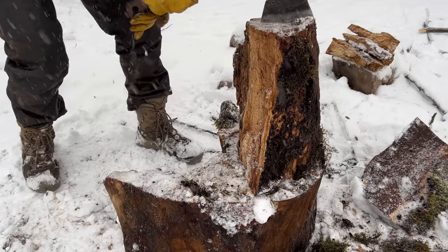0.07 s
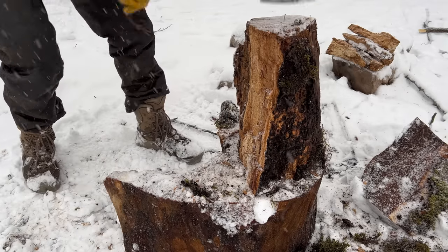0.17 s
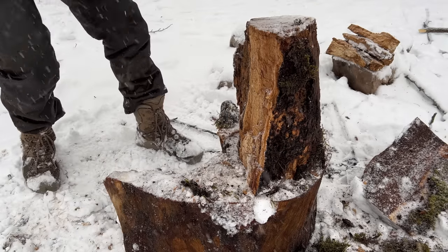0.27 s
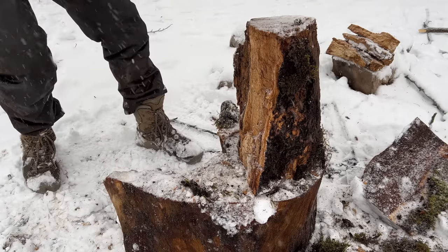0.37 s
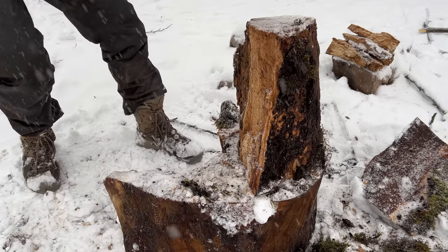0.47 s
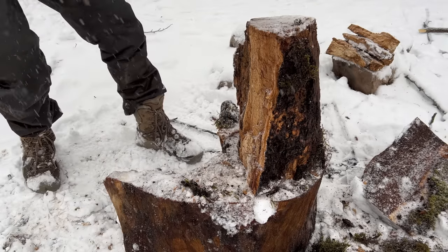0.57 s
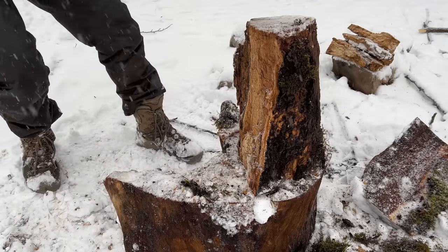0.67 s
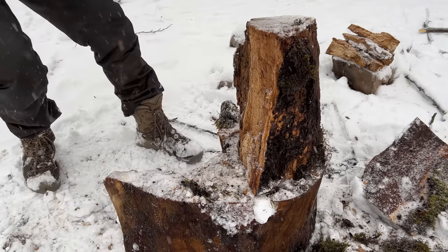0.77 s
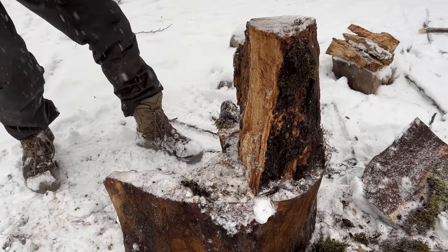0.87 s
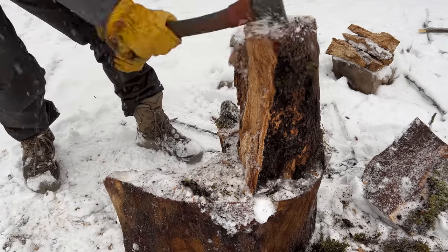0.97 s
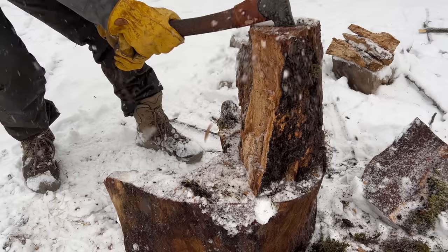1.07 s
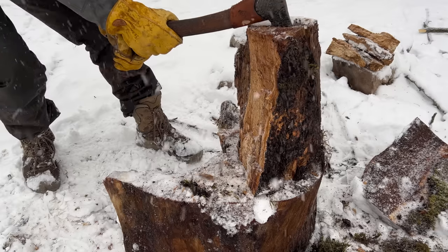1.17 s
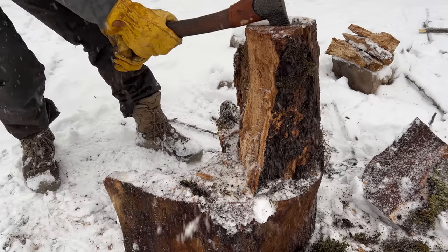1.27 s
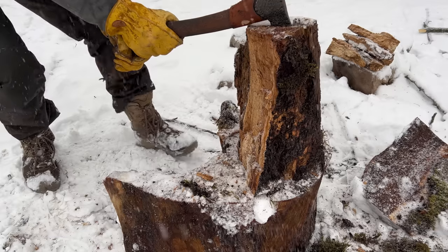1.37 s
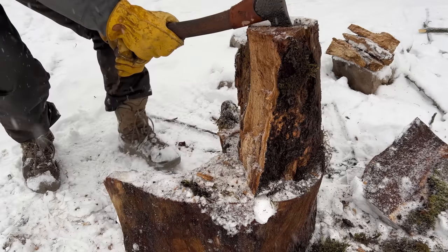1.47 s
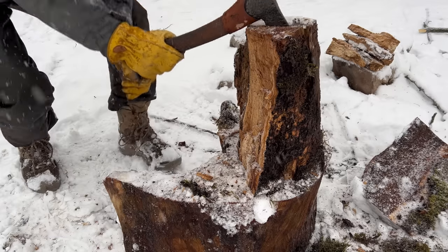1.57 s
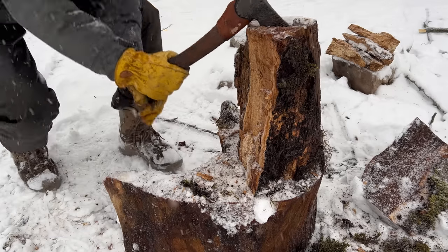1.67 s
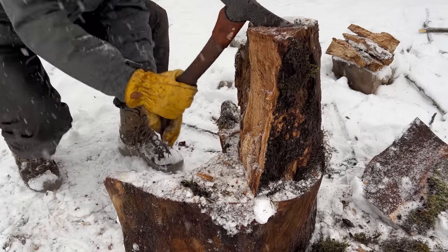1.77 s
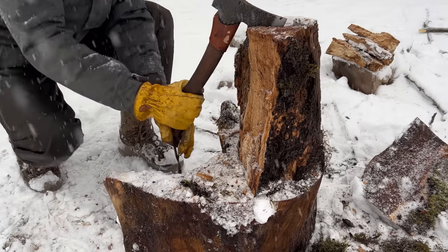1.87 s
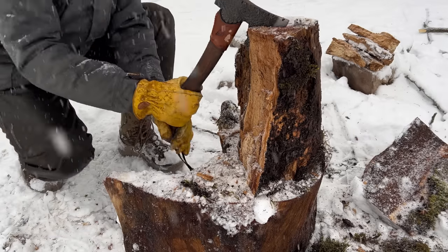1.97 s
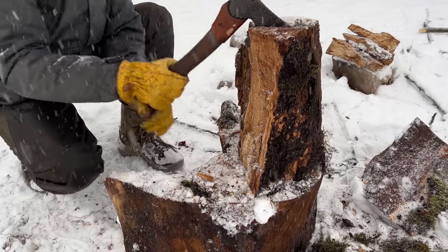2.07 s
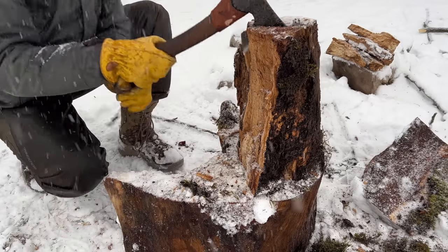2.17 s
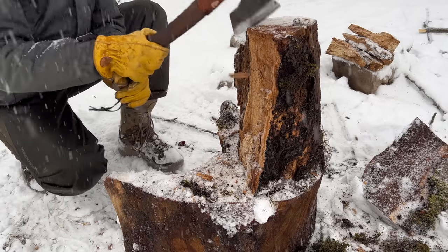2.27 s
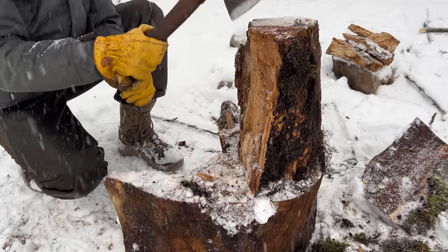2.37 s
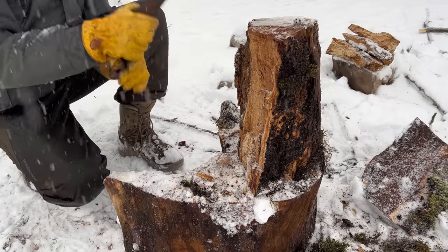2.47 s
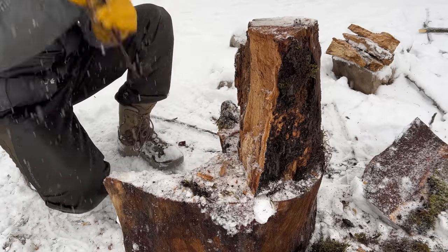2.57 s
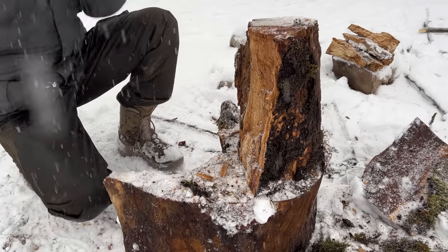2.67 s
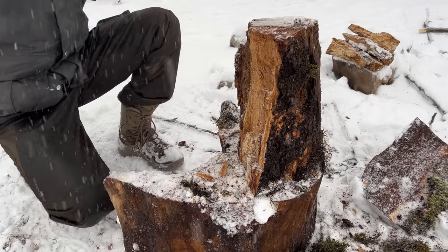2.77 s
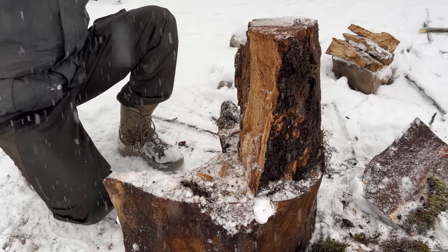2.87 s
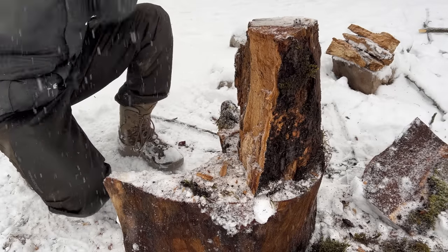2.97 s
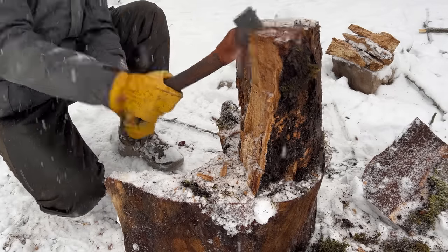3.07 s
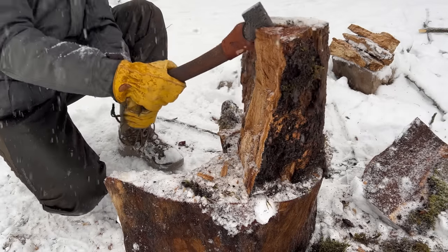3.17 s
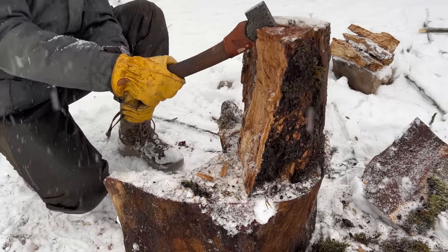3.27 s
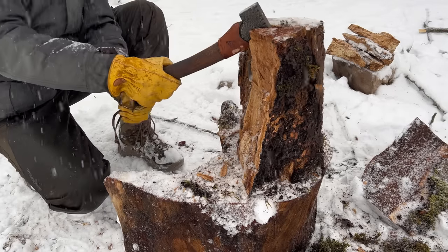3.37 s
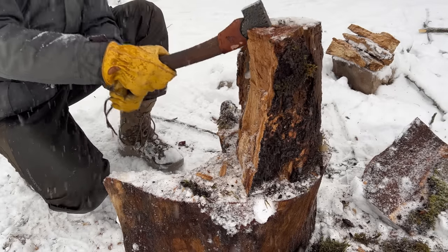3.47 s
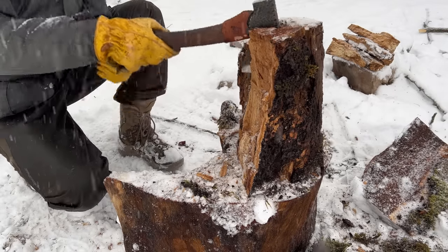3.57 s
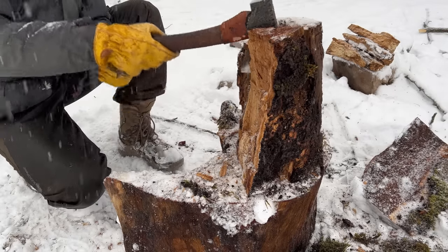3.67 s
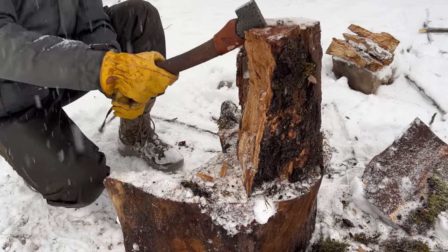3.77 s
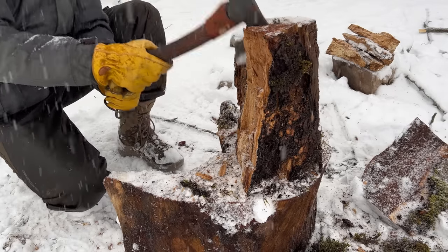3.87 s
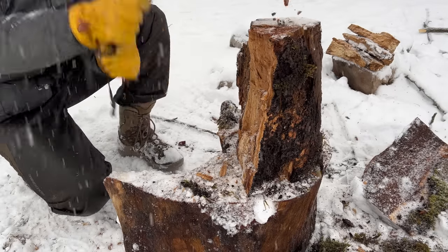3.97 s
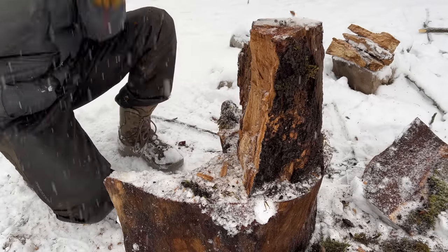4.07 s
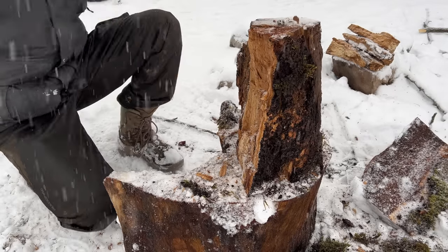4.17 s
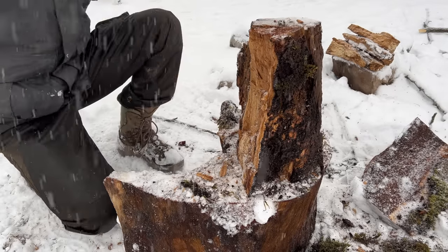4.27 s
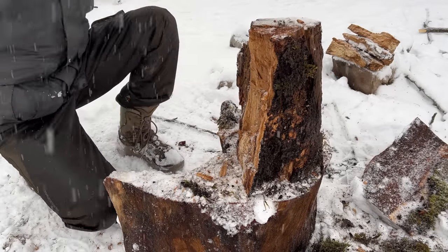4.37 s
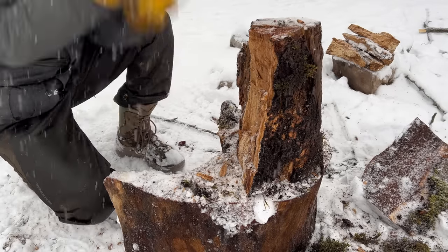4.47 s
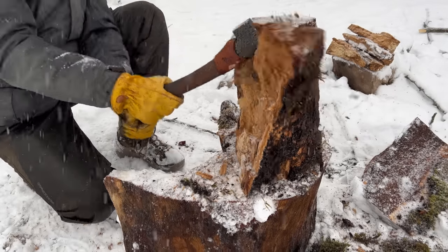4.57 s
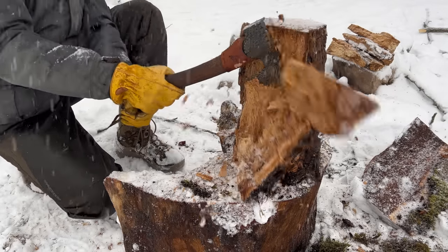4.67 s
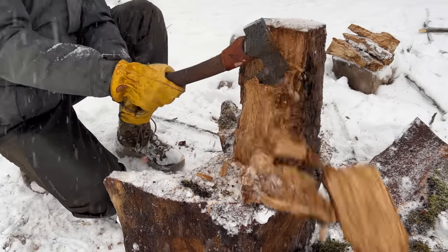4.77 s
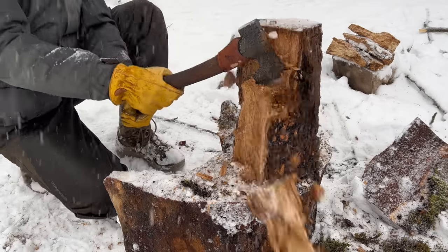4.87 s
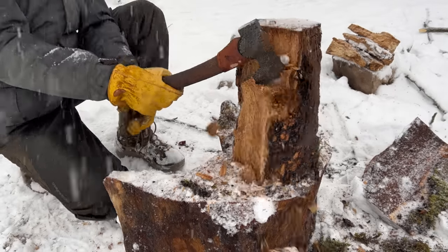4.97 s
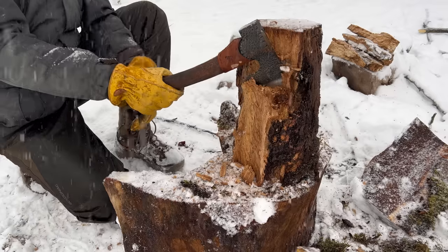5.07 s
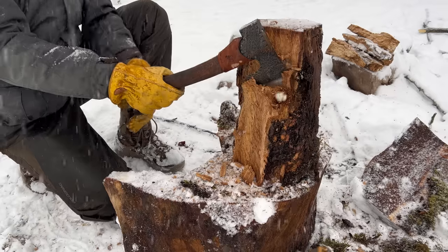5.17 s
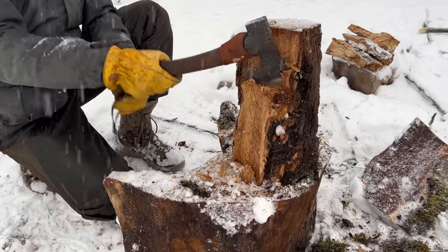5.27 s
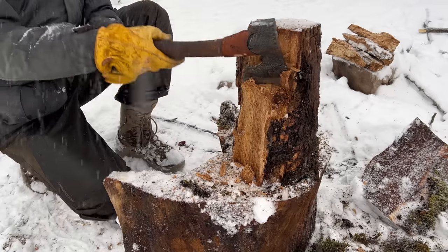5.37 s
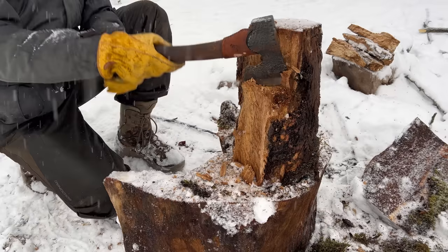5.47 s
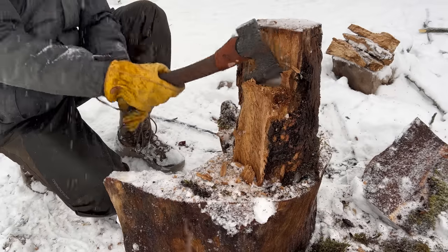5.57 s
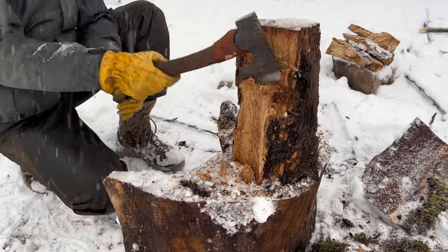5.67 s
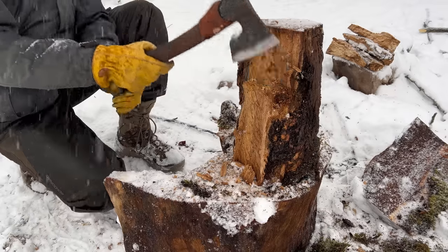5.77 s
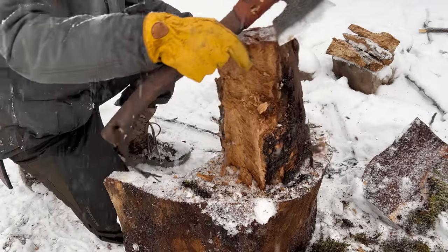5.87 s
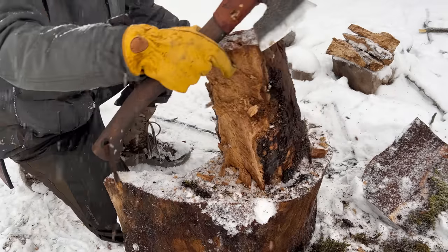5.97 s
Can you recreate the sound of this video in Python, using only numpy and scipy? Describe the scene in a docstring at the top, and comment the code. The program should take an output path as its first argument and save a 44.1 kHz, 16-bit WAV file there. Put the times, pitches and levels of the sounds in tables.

```python
"""An axe chops an upright log on a stump in snow, close to a small camera with two microphone ports; no walls, dry air.
Throughout, boots and knees thud and crunch in the snow and winter clothing rustles: gritty noise and damped rings.
Three blows, at 0.9, 3.1 and 4.5 s, are tearing noise ringing the log's modes and shoving the stump; between them
the blade is levered free and wood creaks. A chunk drops after the second; the last splits off a slab that lands at 4.9 s.
The camera's steep bass filter lets low notes arrive late, so every thud glides down."""
import sys
import numpy as np
from scipy import signal
from scipy.fft import rfft, irfft, next_fast_len
from scipy.io import wavfile
from scipy.ndimage import uniform_filter1d

SR = 44100
rng = np.random.default_rng(int(sys.argv[2]) if len(sys.argv) > 2 else 0)


def field_ratio(decibels):
    """Amplitude ratio for a level in dB (20 dB per decade); scalars and array-likes work."""
    return 10 ** (np.asarray(decibels, dtype=float) / 20)


def unload_wav(signal):
    """Save mono or channel-first audio to the path in sys.argv[1] as 16-bit WAV at rate SR, clipped to [-1, 1]."""
    wavfile.write(
        sys.argv[1],
        SR,
        np.round(np.clip(np.atleast_2d(signal).T, -1, 1) * 32767).astype(np.int16),
    )


N = 264644
SIZE = next_fast_len(N + SR // 2)
HZ = np.maximum(np.arange(SIZE // 2 + 1) * SR / SIZE, 1)
SIDES = np.array([[1], [-1]])  # left, right

# wood fibres tearing; the last two rows are one blow: start_s, length_ms, body_db, treble_db, thump_db
BLOWS = [(0.9298, 6.05, -7.5, -13, -22.5), (3.0569, 17, -14, -17.5, -19), (4.5238, 8.5, -15, -19.5, -38.5),
         (4.5297, 7.1, -11.5, -18, -21)]
# pieces hitting the ground, a chunk, then the slab, edge and face: start_s, length_ms, body_db, treble_db, thump_db
LANDING = [(3.250, 15.9, -42.5, -63.5, -35.5), (4.932, 14, -51, -40.5, -32.5),
           (4.9455, 2.6, -25.5, -31, -33.5), (4.950, 9, -45, -34.5, -70), (4.9598, 4.7, -18.5, -43.5, -29),
           (4.966, 7.5, -39.5, -33, -52)]
# weight shifting in the snow, as the level of its crunch: time_s, level_db
WEIGHT_SHIFTS = [(0, -68), (.5, -63.5), (.7, -70), (.88, -62.5), (1.2, -73), (1.45, -53), (1.53, -59),
                 (1.68, -49.5), (1.9, -58), (2.05, -49.5), (2.3, -68), (2.5, -68), (2.72, -51),
                 (2.87, -63.5), (3.0, -48.5), (3.4, -66), (3.8, -64), (3.95, -72), (4.2, -62), (4.33, -71),
                 (4.45, -58.5), (4.8, -67.5), (5.1, -60.5), (5.45, -72), (5.85, -74.5), (5.93, -63),
                 (6, -62)]
# the log ahead, seen from the two microphone ports: frequency_hz, left_minus_right_db
AHEAD_BALANCE = [(60, -8.5), (110, 7.5), (200, -1.5), (380, 10), (700, 2.5), (1290, 0), (2380, -2.5),
                 (4400, -2), (8120, -0.5), (15000, 0)]


def read(table):
    """A table of frequency and value, read at every frequency."""
    hz, value = np.transpose(table)
    return np.interp(np.log(HZ), np.log(np.maximum(hz, 1)), value)


def through(x, gain):
    """Apply a frequency response."""
    return irfft(rfft(x, SIZE) * gain, SIZE)[..., :N]


def unit(x):
    """Scale to rms 1."""
    return x / np.sqrt(np.mean(abs(x) ** 2))


def ring(hz, width_hz):
    """Response of one resonance, gain 1 at its centre."""
    return 1 / (1 + 1j * (HZ / hz - hz / HZ) * hz / width_hz)


def walk(rate):
    """Random levels held 1 / rate s and smoothed twice; spread near 1."""
    hold = int(SR / rate)
    steps = np.repeat(rng.standard_normal(N // hold + 1), hold)
    return 0.49 * uniform_filter1d(uniform_filter1d(steps, hold), hold)[:N]


def grit(rate, spread_db):
    """Hiss strewn with short grains of uneven size, rate of them a second."""
    size = field_ratio(spread_db * np.minimum(rng.exponential(size=N), 3))
    grains = (rng.random(N) < rate / SR) * size
    return rng.standard_normal(N) * (1 + uniform_filter1d(grains, size=40) * 40)


def add(out, s, sound, pan_db):
    """Mix a short sound in at a time and side."""
    i = int(s * SR)
    out[:, i:i + len(sound)] += field_ratio(SIDES * pan_db / 2) * sound


def rustle(spectrum, level_db, rate, spread_db, flicker_db, likeness):
    """Gritty noise from a wide source; it swells, flickers and is only partly alike in the two ports."""
    mid, side = grit(rate, spread_db), grit(rate, spread_db)
    like = np.clip(likeness, 0, 1)
    pair = np.sqrt(1 + like) * mid + SIDES * np.sqrt(1 - like) * side
    tilt = field_ratio(SIDES * read(AHEAD_BALANCE) / 2)
    swell_db = 1.0
    unrest_db = flicker_db * unit(walk(30)) + swell_db * unit(walk(11))
    return unit(through(pair, field_ratio(read(spectrum)) * tilt)) * field_ratio(level_db + unrest_db)


def moves():
    """Snow crunching under boots and knees, and cloth rubbing on cloth; both flare around the blows."""
    # spectrum of crunching snow: frequency_hz, density_db
    crunch_spectrum = [(18, -38), (30, -11.5), (70, -0.5), (189, -6.5), (226, -2.5), (437, -4.5),
                       (800, -6.5), (1040, -37.5), (1760, -120)]
    # spectrum of the cloth's body: frequency_hz, density_db
    cloth_spectrum = [(290, -34.5), (500, -13), (594, -9), (750, -8.5), (796, -2.5), (1900, 2.5),
                      (2900, -7), (3900, -40.5), (6600, -120)]
    # spectrum of the cloth's treble sheen: frequency_hz, density_db
    sheen_spectrum = [(1800, -16), (2700, -1.5), (4000, -0.5), (5500, -1.5), (7000, -4), (8500, -2.5),
                      (12000, -2.5), (16000, -18.5)]
    # how briskly the body moves, as the level of the cloth's sheen: time_s, level_db
    motion = [(0, -59), (.09, -54), (.13, -61.5), (.27, -61), (.5, -53.5), (.7, -67), (.85, -56),
              (1.03, -65.5), (1.27, -68), (1.42, -52), (1.52, -60), (1.66, -49.5), (1.9, -52.5),
              (2.06, -45.5), (2.16, -49.5), (2.32, -67.5), (2.47, -54.5), (2.6, -59), (2.73, -51),
              (2.88, -65), (3.0, -48), (3.2, -64), (3.42, -63), (3.54, -55.5), (3.66, -68), (3.84, -55),
              (4.08, -60), (4.22, -53.5), (4.34, -66.5), (4.45, -51.5), (4.72, -61), (4.88, -61),
              (5.1, -56.5), (5.44, -60), (5.56, -58), (5.68, -66.5), (5.85, -64), (5.91, -56), (6, -58)]
    t = np.arange(N) / SR
    motion_db = np.interp(t, *np.transpose(motion))
    weight_db = np.interp(t, *np.transpose(WEIGHT_SHIFTS))
    # the cloth's body follows the sheen by 0.58 dB per dB, from -61.5 dB at a quiet -63.5 dB
    steady_db = weight_db, -61.5 + 0.58 * (motion_db + 63.5), motion_db

    # sleeves whip before each blow; snow sprays after each blow and the slab's landing
    swing_s, spray_s = 0.025, 0.043
    swing_db, spray_db = (-51.5, -53.5, -48.5), (-48.5, -48, -49)  # crunch, cloth, sheen
    blows = [row[0] for row in BLOWS[:3]]
    swing = sum((t < s) * np.exp(np.minimum(t - s, 0) / swing_s) for s in blows)
    spray = sum((t >= s) * np.exp(-np.maximum(t - s, 0) / spray_s) for s in blows + [LANDING[4][0]])
    crunch_db, cloth_db, sheen_db = (20 * np.log10(field_ratio(db) + field_ratio(before_db) * swing + field_ratio(after_db) * spray)
                                     for db, before_db, after_db in zip(steady_db, swing_db, spray_db))

    crunch = rustle(crunch_spectrum, crunch_db, 72, 2.2, 2.5, 0.22)
    cloth = rustle(cloth_spectrum, cloth_db, 87, 1.2, 1.4, 0.26)
    sheen = rustle(sheen_spectrum, sheen_db, 150, 0.67, 1.0, 0.099)

    # near the end the crunch and rustle dip for a moment
    dip_s, dip_ms, dip_db = 5.866, 6.3, -23.5
    dip = field_ratio(dip_db * np.exp(-((t - dip_s) * 1000 / dip_ms) ** 2))
    return (crunch + cloth + sheen) * dip


def ticks():
    """Chips and ice grains: dry clicks of fast-dying noise, about an octave and a half wide."""
    # chips and ice grains: start_s, peak_db, pitch_hz, left_minus_right_db
    grains = [(0.013, -31.5, 4000, 2), (0.16, -38, 2600, -4), (0.635, -48, 4950, -0.5),
              (1.1228, -42.5, 2900, 4), (1.22, -49, 3700, -5), (1.3117, -51, 2790, -3),
              (1.4554, -39.5, 2490, -13), (2.44, -43, 2740, 2), (2.566, -46, 2500, -13),
              (2.982, -35, 8550, -2), (3.088, -20.5, 5970, -15), (3.0974, -31, 3040, -0.5),
              (3.3866, -45.5, 3770, -1.0), (3.5728, -34.5, 6200, -5), (4.62, -33, 7720, 1),
              (4.6866, -46, 4310, -10), (5.2609, -44, 4500, -14), (5.3143, -44, 2540, -13),
              (5.3872, -43, 5000, -10), (5.4494, -44, 2520, -15), (5.5398, -39, 6180, -1.5),
              (5.7019, -50, 3430, -25)]
    decay_s = .0012
    t, out = np.arange(int(.012 * SR)) / SR, np.zeros((2, N + SR))
    for s, db, hz, pan_db in grains:
        puff = rng.standard_normal(len(t)) * np.exp(-t / decay_s)
        band = [hz / 1.3, min(hz * 2.2, .4 * SR)]
        click = signal.lfilter(*signal.butter(2, band, "band", fs=SR), puff)
        add(out, s, field_ratio(db) * click / abs(click).max(), pan_db)
    return out[:, :N]


def thud(hz):
    """A broad, damped ring without rumble under it; the packed snow answers a little later, low and soft."""
    t = np.arange(int(.1 * SR)) / SR
    decay_cycles = 0.6
    dull = np.sin(2 * np.pi * hz * t) * np.exp(-t * hz / decay_cycles) * 2.03
    dull = signal.lfilter(*signal.butter(2, .55 * hz, "high", fs=SR), dull)
    answer = np.sin(2 * np.pi * 105 * t) * (t / 0.024) ** 2 * np.exp(2 - t / 0.0081)
    return dull + field_ratio(-17) * answer


def crack(hz):
    """A dry woody crack: a burst of noise dying within milliseconds in a band around hz, peak 1."""
    t = np.arange(int(.1 * SR)) / SR
    decay_s = .0011
    knock = (1 + rng.standard_normal(len(t))) * np.exp(-t / decay_s)
    y = signal.lfilter(*signal.butter(2, [hz / 1.65, hz * 1.95], "band", fs=SR), knock)
    return y / abs(y).max()


def thuds():
    """Thuds with a crack on top, bare knocks, and small scuffs at random that follow the weight in the snow."""
    # thuds of wood, boots and knees: start_s, thud_db, pitch_hz, left_minus_right_db, crack_db
    heavy = [(0.014, -42, 278, 7.5, -34.5), (0.155, -17.5, 230, 12, -34), (1.071, -28, 357, 12.5, -45),
             (1.082, -32, 270, 13, -57), (1.092, -29, 214, 6.5, -41), (1.323, -35, 330, 9.5, -50),
             (1.445, -44, 603, 14, -41.5), (1.464, -41, 433, 10, -36), (1.544, -43, 345, 12, -44),
             (1.607, -33.5, 307, 9, -37.5), (1.637, -63, 522, 17, -33.5), (1.673, -21.5, 165, 6, -31),
             (1.705, -47, 122, -14, -46), (1.741, -43, 388, 11.5, -29.5), (1.761, -40.5, 417, 11.5, -35),
             (1.831, -45, 252, 7, -52), (2.019, -52, 90, 11, -42), (2.602, -44, 352, 5.5, -47),
             (2.657, -41, 105, -12, -39.5), (2.768, -44, 269, -9, -48), (2.828, -40, 170, -8, -42.5),
             (2.908, -41, 149, -10, -61), (2.986, -37, 306, 6, -45), (3.254, -26, 217, -4, -56),
             (3.26, -31, 95, -11, -58), (3.463, -51.5, 111, -16, -44), (3.504, -37.5, 144, -10, -48),
             (3.596, -52, 116, -14, -54), (4.385, -56, 175, 8, -66)]
    # dry knocks of the rocking log, the handle and loose chips: start_s, peak_db, pitch_hz, left_minus_right_db
    knocks = [(0.635, -42, 1820, -17), (0.965, -34.5, 1000, 11), (1.001, -47, 1420, -4),
              (1.394, -40, 1280, 8), (1.476, -40, 676, 16), (1.593, -39.5, 890, 18),
              (1.801, -41.5, 1190, 16), (3.266, -36, 604, -6), (4.572, -34, 1090, 14), (4.61, -34, 996, 8),
              (4.625, -40, 705, 12), (4.665, -41, 974, 8), (4.809, -44, 1370, 3), (5.142, -48, 1870, -13),
              (5.261, -49, 1720, -20), (5.279, -48, 1840, -14), (5.68, -46, 1780, -16)]
    crack_hz = 840
    out = np.zeros((2, N + SR))
    for s, thud_db, hz, pan_db, crack_db in heavy:
        add(out, s + 0.0019, field_ratio(thud_db) * thud(hz) + field_ratio(crack_db) * crack(crack_hz), pan_db)
    for s, db, hz, pan_db in knocks:
        add(out, s + 0.0011, field_ratio(db) * crack(hz), pan_db)

    # scuffs lie 0.5 to 9.5 dB over the crunch level, within an octave of 330 Hz
    scuffs_per_s, scuff_db, scuff_hz = 22, 9.5, 330
    for when, size, pitch, side in rng.random((int(scuffs_per_s * N / SR), 4)):
        s = when * N / SR
        hz = scuff_hz * 2 ** (2 * pitch - 1)
        db = np.interp(s, *np.transpose(WEIGHT_SHIFTS)) + scuff_db - 9 * size
        add(out, s, field_ratio(db) * (thud(hz) + .6 * crack(3.2 * hz)), 22 * (side - .5))
    return out[:, :N]


def creaks():
    """Irregular slips ring one narrow resonance, so its tone stutters while it glides, swells and fades."""
    # wood creaking under load, then the fallen slab rocking: start_s, length_s, first_hz, last_hz, level_db
    slips = [(0.289, 0.19, 301, 251, -58), (0.477, 0.09, 244, 244, -48), (2.69, .11, 350, 299, -53),
             (5.007, .19, 630, 644, -53)]
    t, out = np.arange(N) / SR, 0
    for s, length, first_hz, last_hz, db in slips:
        done = np.clip((t - s) / length, 0, 1)
        stutter = unit(walk(first_hz / 4) + 1j * walk(first_hz / 4))
        cycles = np.cumsum(first_hz + (last_hz - first_hz) * done) / SR
        tone = np.real(stutter * np.exp(2j * np.pi * cycles))
        out = out + tone * np.sin(np.pi * done) * field_ratio(db)
    return out


def ports(balance, phase):
    """How a source reaches the two microphone ports: its own balance and lag at each frequency."""
    # reflections off the housing make the treble lag swing to and fro
    ripple = 1.7 * np.sin(2 * np.pi * HZ / 900) * np.clip(HZ / 2500 - 2.4, 0, 1)
    return field_ratio(SIDES * read(balance) / 2) * np.exp(SIDES * 1j * (read(phase) + ripple) / 2)


def wood(modes):
    """Response of a piece of wood: its (Hz, width Hz, dB) modes over a bed of dense small ones, power 1."""
    gain = sum((-1) ** k * field_ratio(db) * ring(hz, width) for k, (hz, width, db) in enumerate(modes))
    gain = gain + 1j * abs(gain).max() * field_ratio(-18.0) * ring(670, 1700)
    return gain / np.sqrt(np.mean(abs(gain) ** 2))


def ground(bed):
    """Sway of what lies beneath: damped resonances that arrive after the crack, in several waves."""
    sway = 0
    for hz, db, t60_s, late_ms in bed:
        strength = field_ratio(db) * SR * t60_s / np.log(1000)
        wave = ring(hz, np.log(1000) / np.pi / t60_s) * ring(hz, hz / 0.81)
        sway = sway + strength * wave * np.exp(-2j * np.pi * HZ * late_ms / 1000)
    return sway


def impacts(rows, pieces, bed):
    """Tearing noise lasts while the edge travels and stops dead; it rings the wood and shoves the ground."""
    # spectrum of splintering: frequency_hz, gain_db
    tear = [(1200, -21), (2000, 4), (3500, 2), (4500, -16), (6200, -7), (7000, -10), (8300, -3), (12000, 0),
            (16000, -17.5)]
    rise_s, stop_s, patter_s = 0.00061, .0008, 0.0079
    t, out, shove = np.arange(N) / SR, 0, np.zeros(N)
    splinter = unit(through(grit(1000, 2), field_ratio(read(tear))))
    # clipped noise: the tearing is dense and even, without lone peaks
    fibres = np.clip(rng.standard_normal(N), -1.3, 1.3)
    for (s, ms, body_db, treble_db, thump_db), piece in zip(rows, pieces):
        age = t - s
        stop = np.clip(age - ms / 1000, 0, None)
        # a fast rise, an abrupt end, then a faint patter of splinters
        bite = np.clip(age / rise_s, 0, 1) * np.exp(-stop / stop_s)
        patter = (age > 0) * np.exp(-stop / patter_s)
        # the wood is driven hardest while the edge is midway
        swell = 0.45 + 1.2 * np.sin(np.pi * np.clip(age * 1000 / ms, 0, 1))
        out = out + (bite + field_ratio(-18) * patter) * splinter * field_ratio(treble_db)
        drive = (bite * swell + field_ratio(-25.0) * patter) * fibres
        out = out + through(drive, piece) * field_ratio(body_db)
        shove[int((s + ms / 2000) * SR)] += field_ratio(thump_db)
    return out + through(shove, ground(bed))


def falling():
    """Split pieces ring their own modes and shove the packed snow, to the right of the camera."""
    # a thick short piece: mode_hz, width_hz, level_db
    chunk = [(328, 660, -12), (651, 360, -10), (940, 91, -17.5)]
    # the split slab: mode_hz, width_hz, level_db
    slab = [(380, 220, -15), (645, 440, -3.5), (1138, 150, -2.5), (1730, 160, -0.5), (2520, 320, -7)]
    # packed snow: mode_hz, level_db, t60_s, arrives_after_ms
    snow = [(108.8, 1.5, 0.17, 9), (61, -4.5, 0.14, 16), (170, 1, .05, 8.3), (96.4, -17.5, 0.19, 70)]
    # ground to the right, at the two ports: frequency_hz, left_minus_right_db
    right_balance = [(60, -5.5), (110, -5), (200, -1.5), (380, -9.5), (700, -6.5), (1290, -19), (2380, 1),
                     (4400, -8.5), (8120, -2.5), (15000, 2)]
    # ground to the right, at the two ports: frequency_hz, left_leads_radians
    right_phase = [(60, 2.2), (900, 2.1), (1500, -1.5), (2800, -2.4), (4300, -3.5), (5500, -6.5),
                   (16000, -6.4)]
    pieces = [wood(chunk)] + [wood(slab)] * (len(LANDING) - 1)
    return through(impacts(LANDING, pieces, snow), ports(right_balance, right_phase))


def chopping():
    """Each bite rings the log's modes as its own spot favours them and shoves the stump; creaks share the place."""
    # the upright log: mode_hz, width_hz
    log_modes = [(370, 85), (685, 110), (910, 160), (1200, 140), (1730, 120), (2150, 630), (2750, 53),
                 (3450, 410)]
    # how strongly each blow's spot rings the log, a row a bite: one level_db per mode
    spots = [(1, -6, -37, 1, -9, -11.5, -2.5, -2.5), (-8, -1, -7, 1.5, -7.5, -7.5, -27, -6),
             (0.5, 0.5, -0.5, -6, 1, -14, -18, -26), (2, -3, -0.5, -12.5, -0.5, -15.5, -17, -3)]
    # stump under the log: mode_hz, level_db, t60_s, arrives_after_ms
    stump = [(62.3, 2, .055, 15), (70, -16, .08, 66), (61.7, -31.5, 0.39, 110), (122, 2.5, 0.025, 5.91),
             (170, -4.5, 0.05, 8.38), (245.5, -7, 0.022, 2.7)]
    # the log ahead, at the two ports: frequency_hz, left_leads_radians
    ahead_phase = [(60, .3), (330, .1), (600, -1.2), (1700, -1.2), (2300, -2.0), (3300, -2.3), (4400, -4.0),
                   (5500, -5.1), (6400, -6.4), (7200, -5.3), (8200, -6.28), (16000, -6.28)]
    log = [wood([(*mode, db) for mode, db in zip(log_modes, spot)]) for spot in spots]
    return through(impacts(BLOWS, log, stump) + creaks(), ports(AHEAD_BALANCE, ahead_phase))


def scene():
    """Chopping ahead, pieces falling to the right, small handling sounds all about."""
    return moves() + ticks() + thuds() + falling() + chopping()


def top_cut(x):
    """Nothing passes above the cut-off."""
    return signal.sosfilt(signal.butter(12, 16990, fs=SR, output="sos"), x)


def record(dry):
    """The bass filter delays low notes by up to 0.9 of a cycle; the input clips; the treble has two narrow dips."""
    # the treble has two narrow dips and stops near 16 kHz: frequency_hz, gain_db
    treble_dips = [(9300, 1.5), (10400, -14.5), (11300, -5), (12600, -3.5), (13800, -23), (14900, 5.5),
                   (15900, 10.5), (16500, -42)]
    late_cycles, knee_hz, low_hz, clip_level = .9, 450, 80, .85
    late_s = late_cycles / np.maximum(HZ, low_hz) / (1 + (HZ / knee_hz) ** 2)
    # summing the delay over frequency gives the phase
    late = through(dry, np.exp(-2j * np.pi * np.cumsum(late_s) * SR / SIZE))
    clipped = np.clip(late, -clip_level, clip_level)
    mix = through(clipped, field_ratio(read(treble_dips)))
    return top_cut(mix)


dry = scene()
out = record(dry)
unload_wav(out)
```